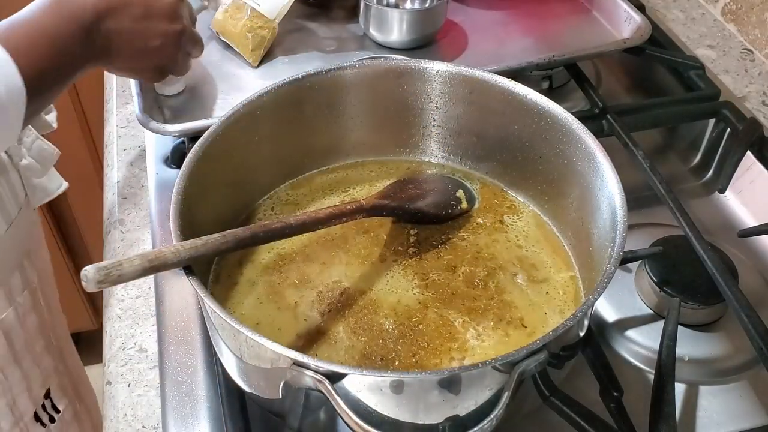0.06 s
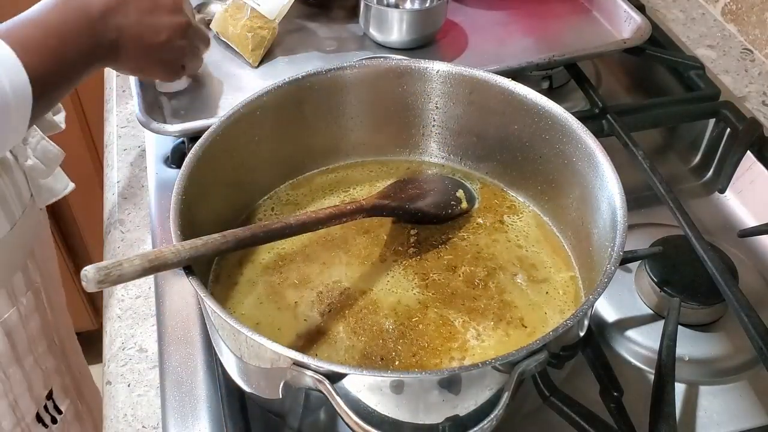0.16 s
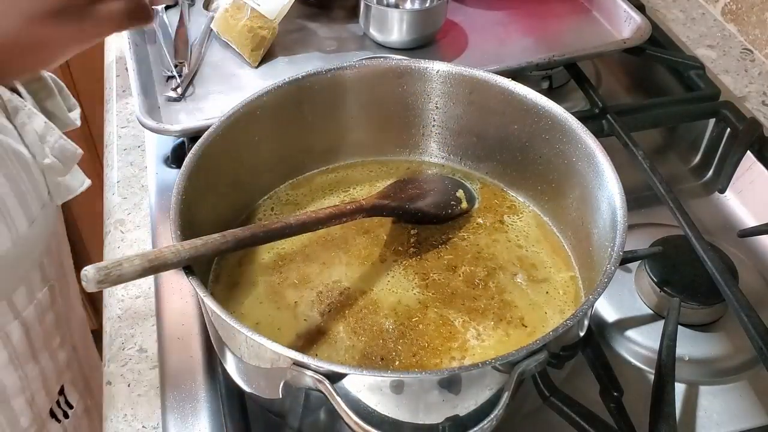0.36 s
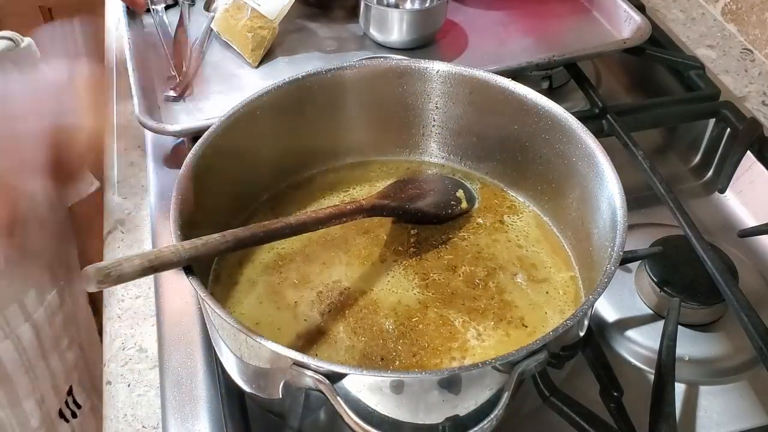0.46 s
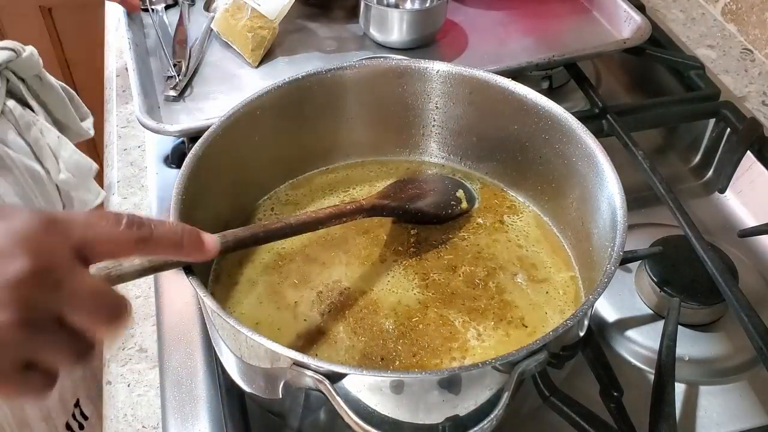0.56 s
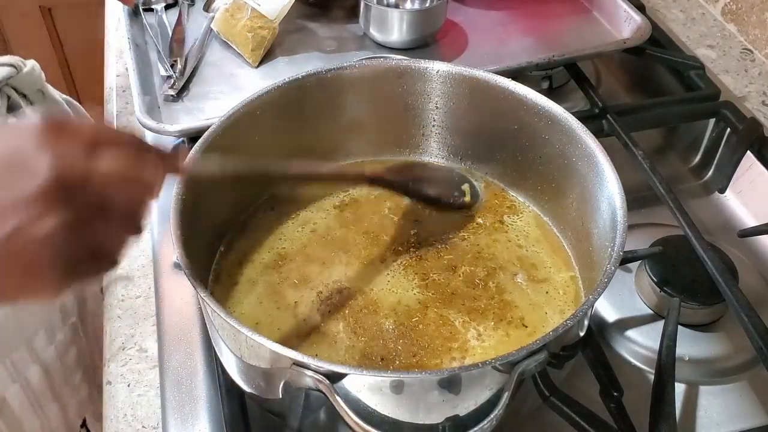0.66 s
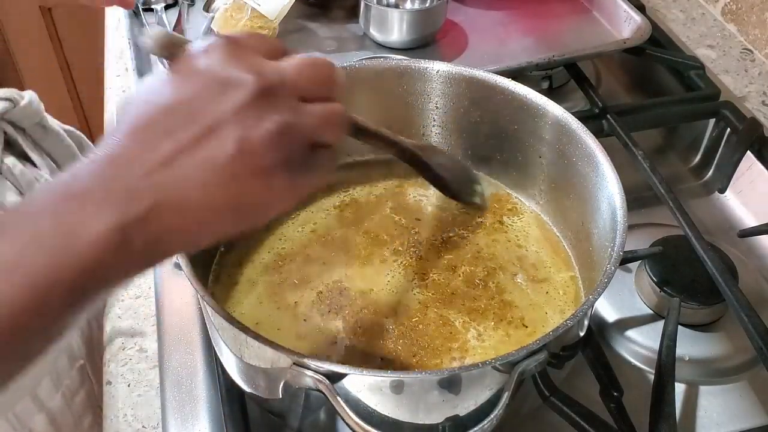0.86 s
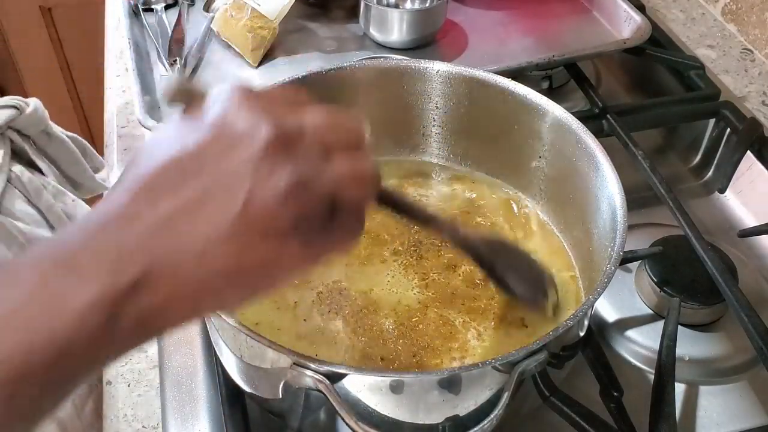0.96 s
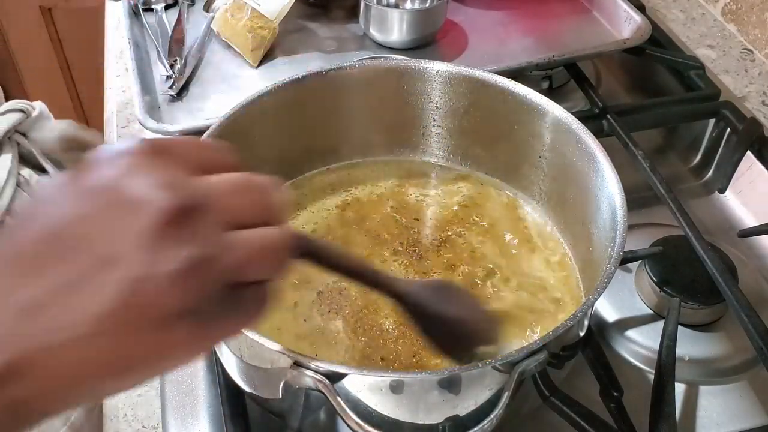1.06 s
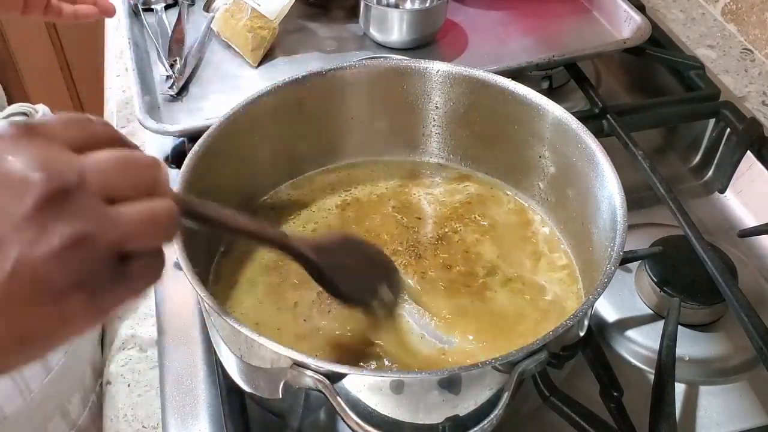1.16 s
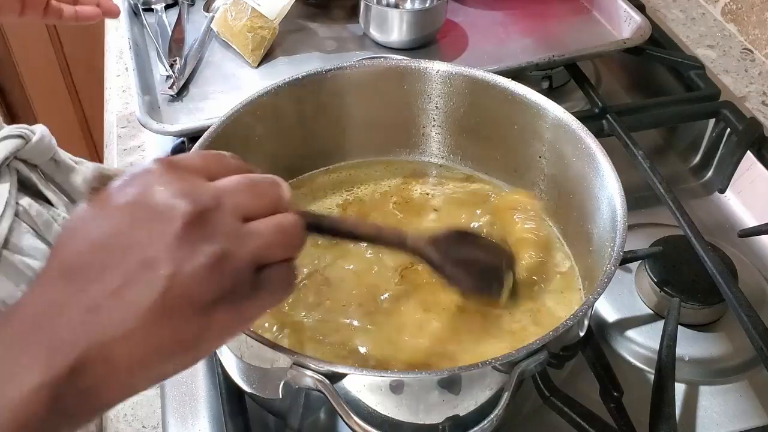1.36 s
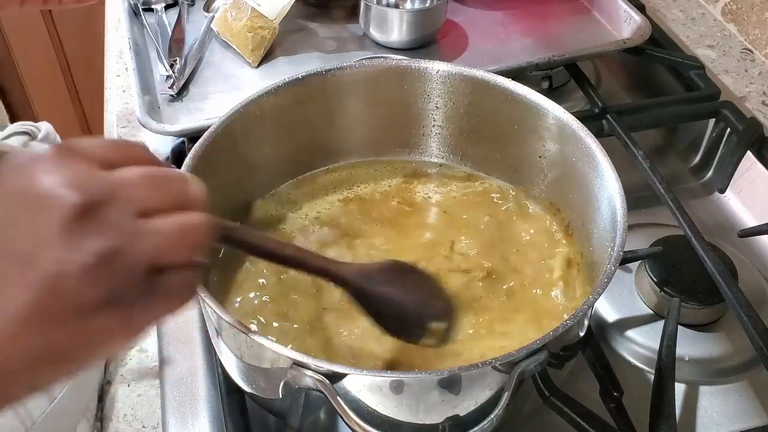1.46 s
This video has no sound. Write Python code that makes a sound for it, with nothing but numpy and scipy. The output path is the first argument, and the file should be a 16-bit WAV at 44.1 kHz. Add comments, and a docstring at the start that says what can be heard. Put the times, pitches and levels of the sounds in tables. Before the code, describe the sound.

A small jar rocks on a thin metal tray, lands with a thud at about 0.2 seconds and scrapes across it in quick rasping jerks until 0.5 seconds, making the tray ring. At about 0.8 seconds a wooden spoon clacks brightly against a steel pot, echoing briefly in the small kitchen. From 1 to 1.5 seconds, very faint stirring follows, with splashes, bubbles and a soft rubbed note.

```python
"""At a kitchen stove a small jar rocks on a thin metal tray, lands with a thud and is shoved across it
in a few rasping jerks that make the tray ring. Next a wooden spoon clacks once against a steel pot.
Then it stirs the broth softly: splashes, swishes, bursting bubbles and a low note rubbed from the pot.
All along the cook's movements rumble faintly, and the small hard room rings on after each knock."""
import sys
import numpy as np
from scipy import signal
from scipy.fft import rfft, irfft
from scipy.io import wavfile

SR = 44100
rng = np.random.default_rng(int(sys.argv[2]) if len(sys.argv) > 2 else 0)


def log_audio(samples):
    """Write samples as a 16-bit WAV file to the path given in sys.argv[1]."""
    # one column per channel
    frames = np.atleast_2d(samples).T
    # limit to full scale, then quantise
    limited = np.clip(frames, -1, 1)
    pcm = np.round(limited * 32767).astype(np.int16)
    wavfile.write(sys.argv[1], SR, pcm)


N = 66150
T = np.arange(N) / SR
RING_T = T[:SR * 4 // 5]  # time axis of one ring; "t60" below is the time to fade by 60 dB

# how alike left and right sound: (frequency [Hz], correlation [1 = the same])
STEREO_LIKENESS = [(40, .8), (90, .85), (180, .96), (550, .82), (1000, .42), (2000, -.03), (16000, -.08)]


def jar_on_tray():
    """The jar knocks on the tray, then sticks and slips; each jerk is a catch, a rasp and fine grit."""
    # jerks of the jar: (time [s], length [s], rasp [dB], grit [dB], opening catch [dB])
    jerks = [(0.0, 0.03, -47.5, -42.5, -51), (0.265, 0.015, -32.5, -48.5, -18.5),
             (0.273, 0.055, -34, -28.5, -29.5), (0.302, 0.022, -22, -23.5, -16),
             (0.331, 0.039, -32.5, -31, -24.5), (0.35, .015, -20, -20.5, -1),
             (0.368, 0.036, -27.5, -29, -14), (0.3996, 0.018, -18, -20, 1.5),
             (0.419, 0.0091, -29.5, -22, -11.5), (0.4418, 0.0038, -17, -20.5, -2),
             (0.456, 0.0082, -26.5, -23, -7), (0.478, 0.013, -26, -27, -6),
             (0.502, 0.013, -40, -53.5, -27.5)]
    # tone of the coarse slips: (frequency [Hz], gain [dB])
    rasp_colour = [(100, -7), (200, 2.5), (550, 3), (1200, 3.5), (3000, 5), (6000, 8), (10000, -7),
                   (16000, -3)]
    # tone of the fine grit: (frequency [Hz], gain [dB])
    grit_colour = [(200, -27), (1500, -9), (4000, 0), (7000, 0), (10000, 10.5), (13000, 3), (15500, 3)]
    # the base bumps the tray, on landing and while sliding: (time [s], level [dB])
    thuds = [(0.176, -18), (0.2234, 8.5), (0.2283, 15), (0.2414, 7.5), (0.360, 12), (0.3665, 8.5),
             (0.378, 3.5), (0.411, 9), (0.525, -20.5)]
    # softness of those bumps: (frequency [Hz], gain [dB])
    thud_colour = [(100, -11), (200, 0.5), (500, 0.5), (1200, 3.5), (1800, -7), (3400, -5.5), (6000, -11),
                   (10000, -18.5), (16000, -32)]
    # the jar rocks on its base: (time [s], level [dB])
    rocks = [(0.004, -5.5), (0.013, -24.5), (0.027, -4), (0.044, -17), (0.058, -11.5)]
    # dull tone of the rocking: (frequency [Hz], gain [dB])
    rock_colour = [(100, -9.5), (200, -9), (380, 10), (600, -2), (850, 3.5), (1300, -8), (2200, -16.5),
                   (5000, -20.5), (16000, -21)]
    # the tray's strongest notes: (frequency [Hz], level [dB], t60 [s])
    tray_modes = [(148.15, -21.5, .2), (176.3, -26, 0.53), (199.3, -22.5, .27), (214, -33, 0.25),
                  (388, -31.5, 0.6), (414, -26, 0.19), (542.4, -20.5, 0.12), (577.6, -16, .15),
                  (757.7, -18.5, .14), (885.5, -18, 0.35), (1010, -22, 0.17), (1135, -22, 0.17),
                  (1164, -18, 0.076), (1351, -21, 0.12), (2437, -20, 0.12), (3550, -22.5, 0.071)]
    # shrill notes of the rubbing contact: (frequency [Hz], level [dB], t60 [s])
    shrill_modes = [(6726, -29.5, 0.11), (10270, -26, .08), (10340, -26.5, .08), (14500, -20, .11),
                    (15000, -17.5, .1)]
    attack_s, release_s = 0.001, 0.005
    rasp_gain, grit_gain = 0, 0
    for start, length, rasp_db, grit_db, _ in jerks:
        rise = np.clip((T - start) / attack_s, 0, 1)
        push = rise * np.exp(-np.maximum(T - start - length, 0) / release_s)
        rasp_gain += from_db(rasp_db) * push
        grit_gain += from_db(grit_db) * push
    catches = blows([(start + attack_s, catch_db) for start, *_, catch_db in jerks])
    slips = coloured(rasp_gain * grains(per_s=3500, spread_db=4.5) + catches, rasp_colour)
    grit = coloured(grit_gain * grains(per_s=9000, spread_db=3), grit_colour)
    knocks = coloured(blows(thuds), thud_colour) + coloured(blows(rocks), rock_colour)
    notes = through(slips + grit + knocks, modal_ring(tray_modes, room_db=-23.5))
    shrill = through(slips + grit, modal_ring(shrill_modes, room_db=-14.5))
    return sliding(slips) + tray(grit) + tray(knocks) + notes + shrill


def sliding(force, spots=3, travel_s=(0.33, 0.47)):
    """The jar travels over the tray, so the ring passes from one spot's pattern to the next."""
    place = np.interp(T, travel_s, [0, spots - 1])
    shares = [np.maximum(1 - abs(place - spot), 0) for spot in range(spots)]
    return sum(tray(force * np.sqrt(share)) for share in shares)


def tray(force):
    """The thin metal sheet rings, struck at a new spot on each call."""
    # tone of the sheet's ring: (frequency [Hz], relative level [dB])
    sheet_colour = [(90, -21.5), (140, -14), (190, 1), (290, -23.5), (420, -9), (640, 1.5), (880, 1),
                    (1400, -1), (2000, -0.5), (3200, -1), (5000, -6.5), (8000, -6.5), (12000, -11),
                    (15500, 0)]
    sheet = dense_ring(sheet_colour, t60=0.14, damping=0.9, room_db=-11, room_slope_db=-1.96, crack_db=4)
    dip = signal.iirnotch(680, Q=6, fs=SR)  # the tray gives off little sound at 680 Hz
    return through(force, signal.lfilter(*dip, sheet))


def spoon_on_pot():
    """Hard wood on steel: a bright clack damped by the broth, and later a small tick."""
    # the spoon meets the pot: (time [s], level [dB])
    clacks = [(0.757, 10), (0.7615, -31), (1.083, -39.5)]
    # tone of the steel wall's ring: (frequency [Hz], relative level [dB])
    wall_colour = [(150, -16), (300, -13), (500, -8), (700, -4), (1000, -4.5), (1900, 2), (3100, 9),
                   (4500, 1.5), (6500, 1.5), (9000, 0), (12000, -1.5), (15500, -3)]
    # the pot's own notes: (frequency [Hz], level [dB], t60 [s])
    pot_modes = [(194.3, -34, 0.91), (240, -37, 0.46), (517, -20.5, 0.29), (567, -29, 0.55),
                 (825, -23, 0.37), (930, -22, .12), (1047, -21, 0.24), (1502, -16.5, 0.17),
                 (2395, -12.5, 0.2), (3178, -9.5, 0.13), (3140, -17, .4), (3656, -18.5, 0.22),
                 (4280, -15.5, 0.25), (6980, -18, 0.14)]
    # a light tick of the spoon under the broth: (time [s], level [dB])
    ticks = [(1.3602, -27)]
    # tone of that tick: (frequency [Hz], relative level [dB])
    tick_colour = [(300, -2.5), (900, -0.5), (2000, -11), (4200, 8), (6500, -7), (10000, -13), (16000, -21)]
    wall = dense_ring(wall_colour, t60=0.3, damping=0.92, room_db=-7.5, room_slope_db=2.52, crack_db=-14)
    first_share, swell_s = 0.51, 0.0058  # the wall takes a moment to ring at full strength
    swell = 1 - (1 - first_share) * np.exp(-RING_T / swell_s)
    pot = unit(wall * swell) + modal_ring(pot_modes, room_db=-28)
    tick = dense_ring(tick_colour, t60=0.033, damping=0.27,
                      room_db=-13.5, room_slope_db=-3.5, crack_db=15)
    return through(blows(clacks), pot) + through(blows(ticks), tick)


def stirring():
    """Fine splashes and bubbles sound the hollow of the pot, and the spoon swishes through the broth."""
    # strength of the stirring: (time [s], level [dB])
    strength = [(0.95, -88.5), (1.02, -68), (1.14, -98), (1.235, -65.5), (1.295, -80), (1.318, -59.5),
                (1.36, -62.5), (1.41, -61), (1.45, -72), (1.48, -65.5), (1.5, -74.5)]
    # tone of the splashing broth: (frequency [Hz], relative level [dB])
    broth_colour = [(200, -16), (600, 4.5), (1400, -6), (2100, -2.5), (2800, -0.5), (4000, 1), (6500, -2),
                    (10000, -6), (15500, -11)]
    # wet swish as the spoon breaks the surface: (time [s], level [dB])
    swish_levels = [(1.065, -98.5), (1.085, -67), (1.12, -90), (1.297, -100.5), (1.309, -61), (1.33, -61),
                    (1.37, -74.5), (1.41, -74.5), (1.46, -89), (1.48, -71.5), (1.5, -78)]
    # tone of that swish: (frequency [Hz], relative level [dB])
    swish_colour = [(1000, -13), (4000, -6), (7000, 2.5), (12000, 0), (16000, -8.5)]
    hollow = dense_ring(broth_colour, t60=0.031, damping=0.21,
                        room_db=-16, room_slope_db=1.5, crack_db=1.5)
    drops = level(strength) * grains(per_s=7500, spread_db=6)
    splash = through(drops + from_db(-2) * bubbles(), hollow)
    swish = np.sqrt(N) * level(swish_levels) * band_noise(swish_colour)
    return splash + swish


def bubbles(t60=0.061, rise_per_s=0.81):
    """Each bubble is a short ping that rises in pitch, placed a little to the left or right."""
    # bubbles that burst behind the spoon: (time [s], starting pitch [Hz], relative level [dB])
    bursts = [(1.015, 1620, -61), (1.212, 2000, -72.5), (1.228, 2070, -65), (1.318, 2150, -66),
              (1.386, 2010, -65.5), (1.408, 2000, -65), (1.428, 1820, -63.5), (1.443, 1960, -61.5)]
    out = 0
    for start, hz, db in bursts:
        age = np.maximum(T - start, 0)
        phase = 2 * np.pi * hz * age * (1 + rise_per_s * age / 2)
        ping = np.sin(phase) * from_db(db - 60 * age / t60)
        pan_db = rng.normal(0, 1.68)
        out += ping * from_db([[pan_db], [-pan_db]])
    return out


def spoon_rub(hz=577):
    """The spoon rubs a low note out of the pot; uneven friction makes its loudness waver."""
    # strength of the rubbing: (time [s], relative level [dB])
    strength = [(1.2, -92), (1.31, -71), (1.38, -74), (1.44, -61), (1.47, -66.5), (1.5, -72.5)]
    smoothing = unit(np.exp(-T / 0.0076))
    friction = 1 + 0.24 * through(grains(per_s=1500, spread_db=3.5), smoothing)
    note = np.sqrt(2) * level(strength) * friction * np.sin(2 * np.pi * hz * T)
    return note * from_db([[-4], [2]])  # louder on the right


def background():
    """The cook's movements rumble over the quiet air of the kitchen."""
    # rumble of the movements: (time [s], level [dB])
    rumble_levels = [(0, -25), (0.035, -53), (0.07, -45), (0.11, -51.5), (0.17, -56), (0.28, -48),
                     (0.34, -44), (0.54, -48), (0.59, -52.5), (0.68, -57.5), (0.76, -56.5), (0.815, -53),
                     (0.85, -52), (0.885, -50.5), (0.95, -65.5), (1.09, -65), (1.16, -82), (1.5, -80)]
    # tone of the rumble: (frequency [Hz], relative level [dB])
    rumble_colour = [(25, -23.5), (50, -17), (88, -1.5), (130, -8), (220, -24.5), (500, -27), (1500, -37)]
    # tone of the air: (frequency [Hz], relative level [dB])
    air_colour = [(25, -5.5), (100, -10.5), (200, -2.5), (450, -8), (1000, -15), (2000, -20), (6000, -17.5),
                  (16000, -23.5)]
    rumble = level(rumble_levels) * band_noise(rumble_colour)
    air = from_db(-69.5) * band_noise(air_colour)
    return np.sqrt(N) * (rumble + air)


def kitchen_fade(hz, t60, room_db):
    """An object's own fade, joined by the room's echo, which starts at room_db."""
    # how long the kitchen rings: (frequency [Hz], t60 [s])
    room_t60 = [(150, 0.51), (600, 0.54), (3000, 0.42), (7000, 0.36), (15000, 0.24)]
    echo = from_db(room_db - 60 * RING_T / at_hz(room_t60, hz))
    return np.hypot(from_db(-60 * RING_T / t60), echo)


def dense_ring(colour, t60, damping, room_db, room_slope_db, crack_db, crack_t60=0.026):
    """A brief crack, then countless close notes that blur into fading noise."""
    def envelope(hz):
        # each octave above 1 kHz shortens the ring and takes room_slope_db off the echo
        octaves = max(np.log2(hz / 1000), 0)
        ring = kitchen_fade(hz, t60 * 2 ** (-damping * octaves), room_db - room_slope_db * octaves)
        return np.hypot(ring, from_db(crack_db - 60 * RING_T / crack_t60))
    return band_noise(colour, envelope)


def modal_ring(modes, room_db):
    """An object's separate notes (modes); the high ones reach left and right out of step."""
    out = 0
    for hz, db, t60 in modes:
        shift = np.arccos(at_hz(STEREO_LIKENESS, hz)) * rng.choice([-1, 1]) / 2
        wave = rng.choice([-1, 1]) * np.sin(2 * np.pi * hz * RING_T + np.array([[shift], [-shift]]))
        out += from_db(db) * unit(wave * kitchen_fade(hz, t60, room_db))
    return out


def band_noise(colour, envelope=lambda hz: np.ones(N)):
    """Narrow bands of stereo noise, each with its own loudness curve; colour sets the power per Hz."""
    out, edges = 0, np.geomspace(25, 17000, 27)
    white = rng.standard_normal((2, 2, len(envelope(edges[0]))))
    for k, (low, high) in enumerate(zip(edges, edges[1:])):
        hz = np.sqrt(low * high)
        band = signal.butter(2, [low, high], "band", fs=SR, output="sos")
        mid, side = signal.sosfilt(band, white[k % 2] * (envelope(hz) + 1e-12))
        alike = at_hz(STEREO_LIKENESS, hz)
        pair = np.sqrt(1 + alike) * unit(mid) + np.sqrt(1 - alike) * unit(side) * np.array([[1], [-1]])
        out += from_db(at_hz(colour, hz)) * np.sqrt(high - low) * pair
    return unit(out)


def blows(rows):
    """One sharp tap for each row of (time [s], level [dB])."""
    force = np.zeros(N)
    for start, db in rows:
        force[int(start * SR)] += from_db(db)
    return force


def grains(per_s, spread_db):
    """Tiny random taps of uneven size, with an average power of 1."""
    sizes = from_db(spread_db * np.minimum(rng.exponential(1, N), 4)) * rng.choice([-1, 1], N)
    return np.sqrt(N) * unit(sizes * (rng.random(N) < per_s / SR))


def coloured(x, colour, size=4096):
    """Shape the tone by rows of (frequency [Hz], gain [dB])."""
    gains = from_db(at_hz(colour, np.arange(size // 2 + 1) * SR / size))
    cepstrum = irfft(np.log(gains))
    # minimum phase: the filter never sounds before the tap that drives it
    cepstrum[1:size // 2] *= 2
    cepstrum[size // 2 + 1:] = 0
    return through(x, irfft(np.exp(rfft(cepstrum))))


def through(force, response):
    """Every tap in the force sets off a copy of the response."""
    return signal.fftconvolve(np.atleast_2d(force), np.atleast_2d(response), axes=-1)[:, :N]


def from_db(db):
    """Turn decibels into a gain."""
    return np.exp(np.asarray(db) * np.log(10) / 20)


def at_hz(points, hz):
    """Read a table between its rows, with octaves evenly spaced."""
    frequencies, values = np.transpose(points)
    return np.interp(np.log(hz + 1e-9), np.log(frequencies), values)


def level(points):
    """Gain over time from rows of (time [s], level [dB])."""
    return from_db(np.interp(T, *np.transpose(points)))


def unit(x):
    """Scale so that the channels have an average energy of 1."""
    return x / np.sqrt(np.mean(np.sum(x ** 2, axis=-1)) + 1e-20)


def scene():
    """All the sources together, in stereo."""
    return jar_on_tray() + spoon_on_pot() + stirring() + spoon_rub() + background()


def record(dry):
    """Round off the highest peaks and cut the very top of the treble."""
    ceiling, cutoff_hz = 1.3, 15800
    top_cut = signal.ellip(12, 0.1, 80, cutoff_hz, fs=SR, output="sos")
    return signal.sosfilt(top_cut, ceiling * np.tanh(dry / ceiling))


dry = scene()
out = record(dry)
log_audio(out)
```